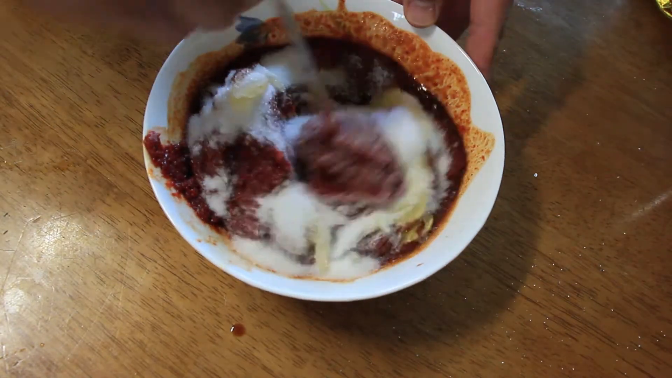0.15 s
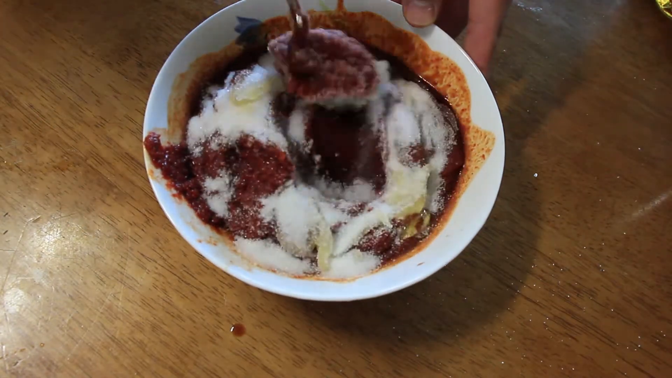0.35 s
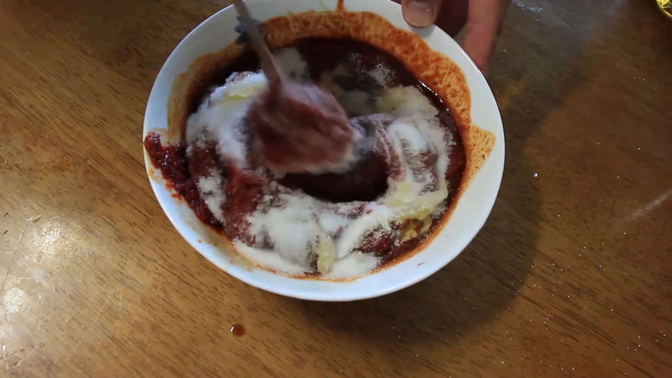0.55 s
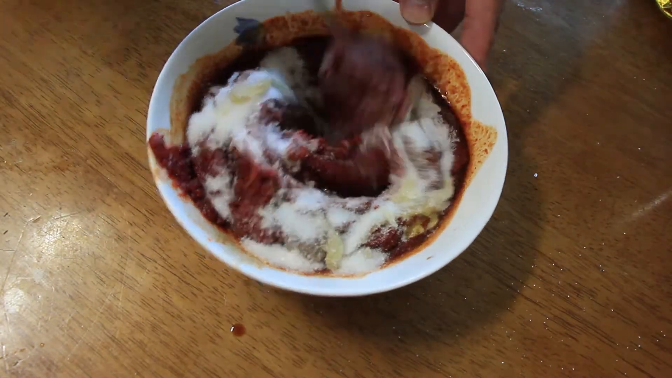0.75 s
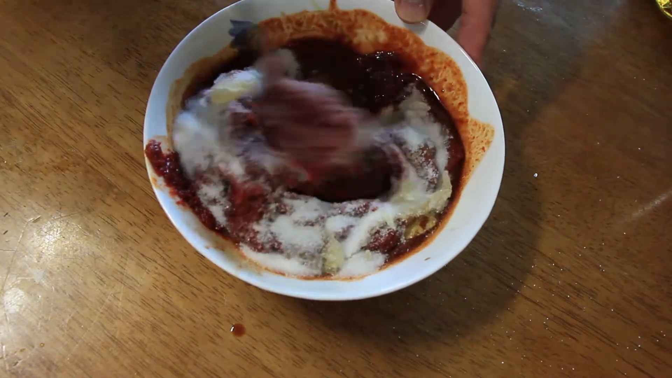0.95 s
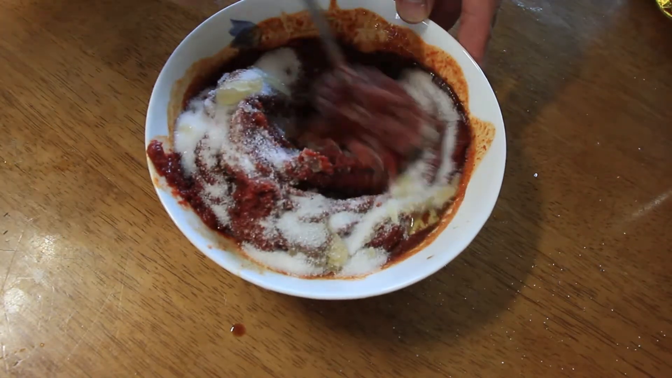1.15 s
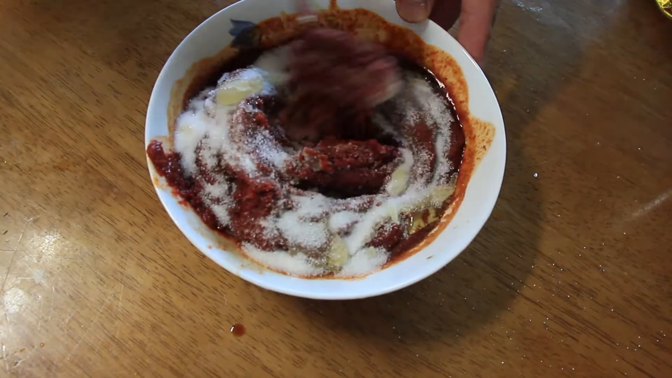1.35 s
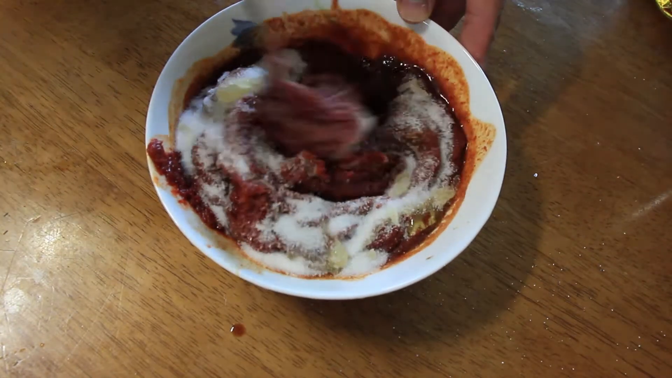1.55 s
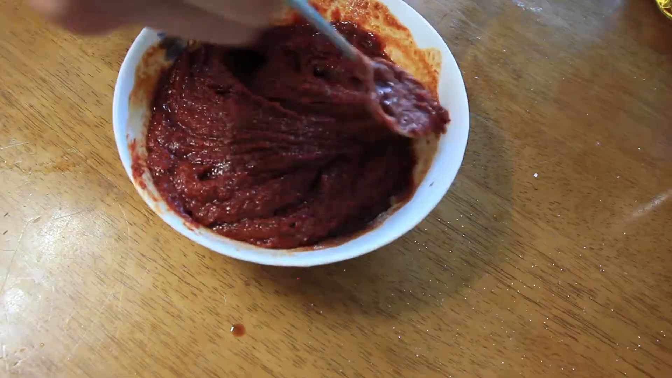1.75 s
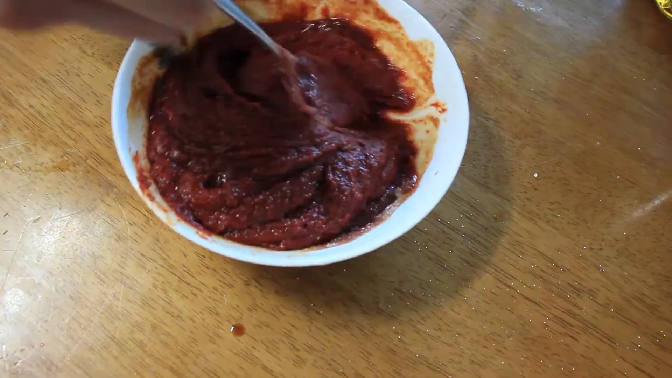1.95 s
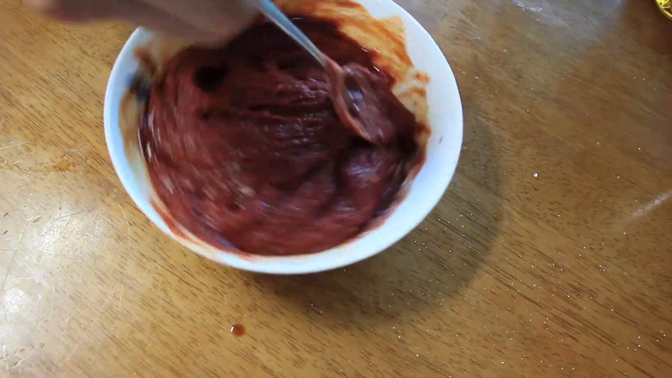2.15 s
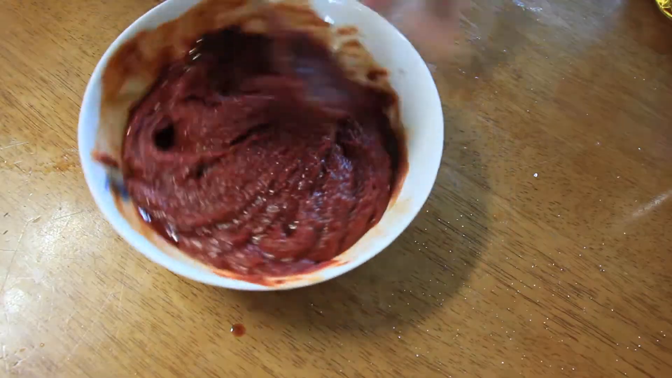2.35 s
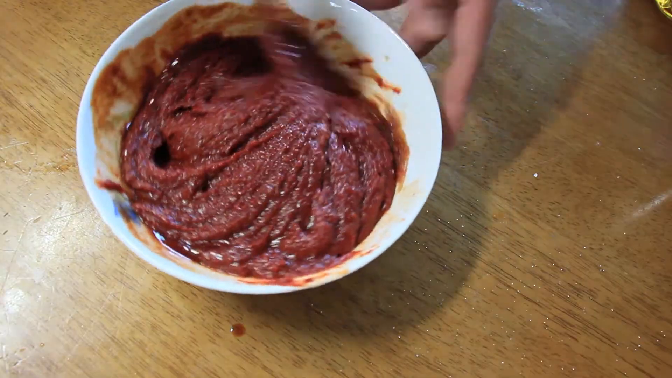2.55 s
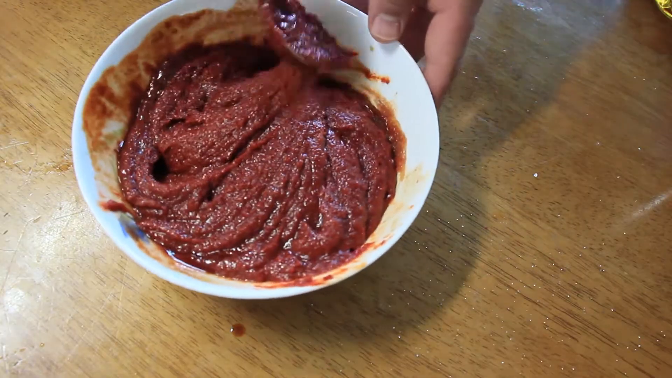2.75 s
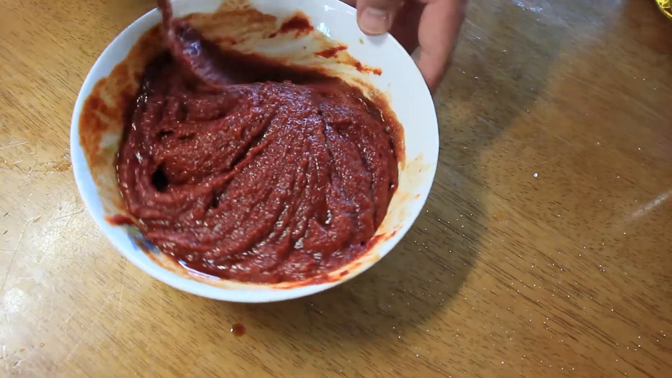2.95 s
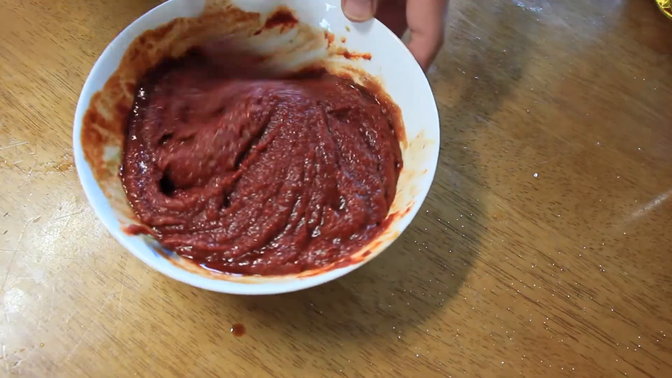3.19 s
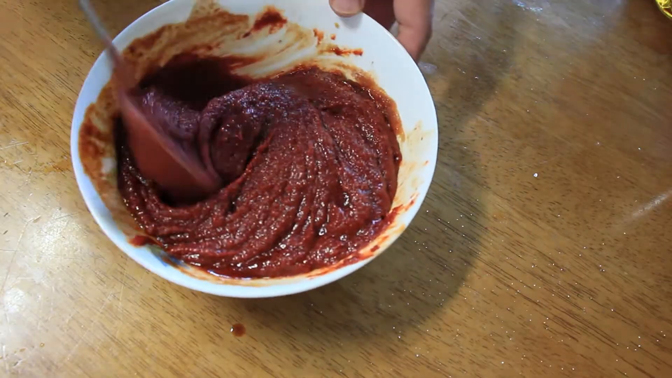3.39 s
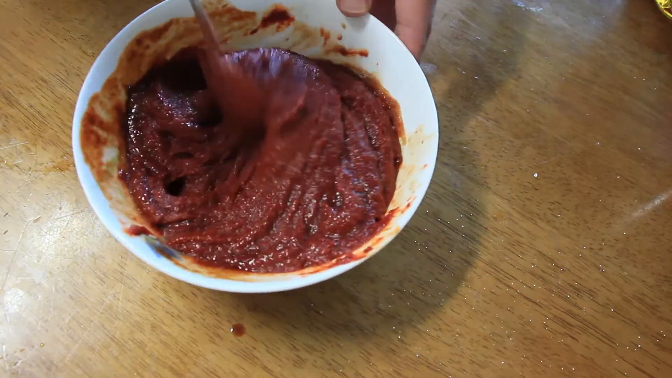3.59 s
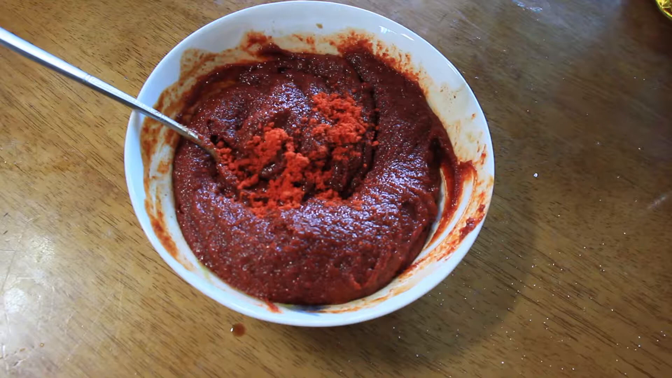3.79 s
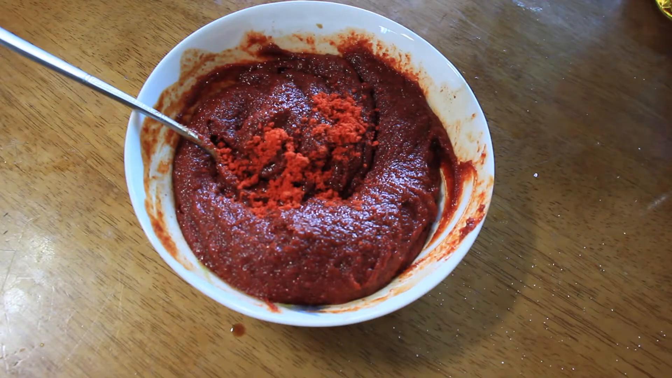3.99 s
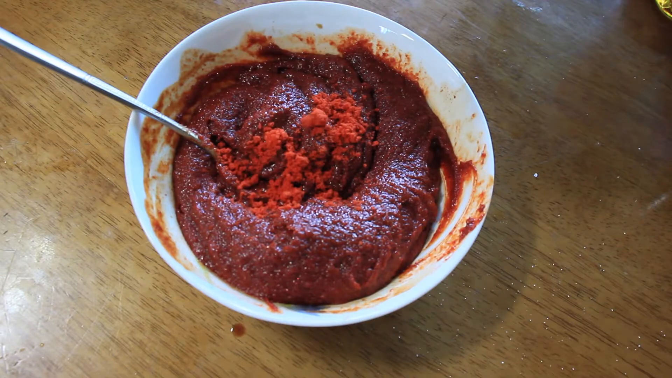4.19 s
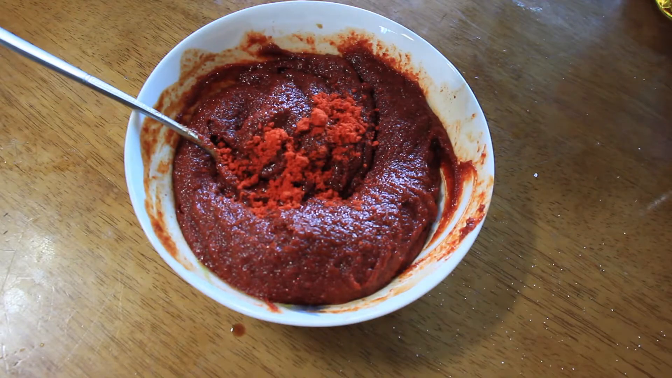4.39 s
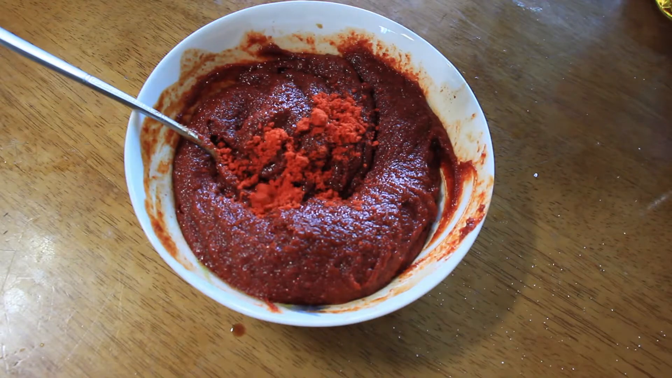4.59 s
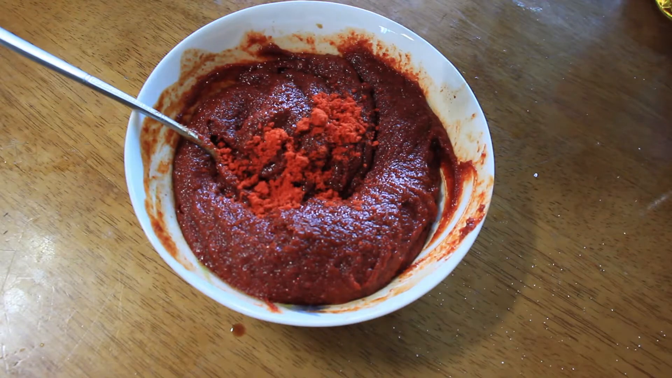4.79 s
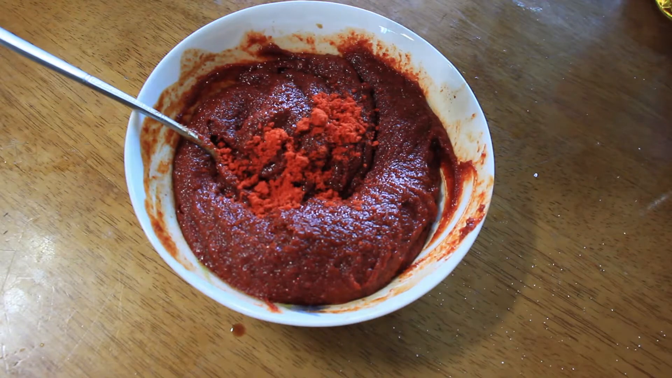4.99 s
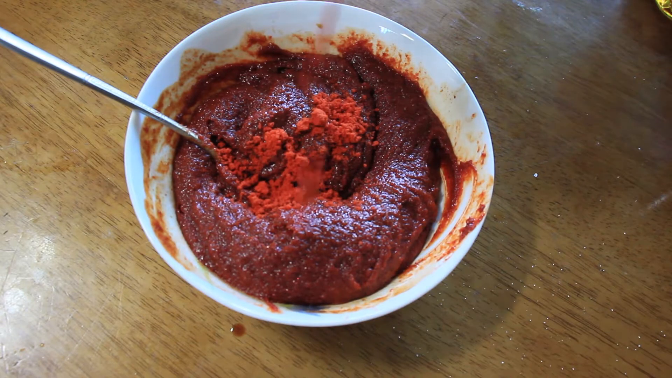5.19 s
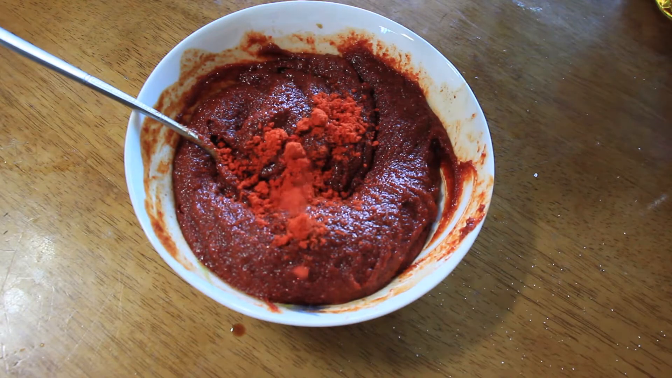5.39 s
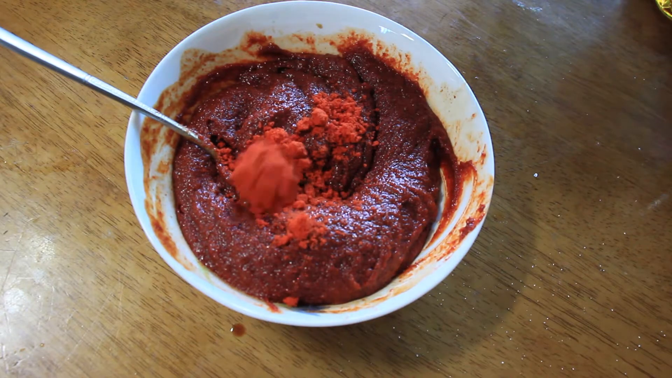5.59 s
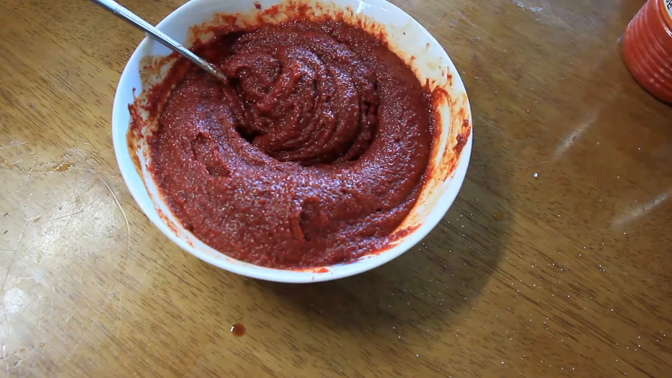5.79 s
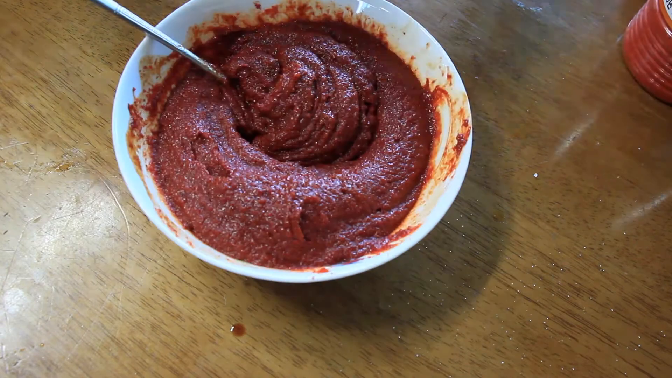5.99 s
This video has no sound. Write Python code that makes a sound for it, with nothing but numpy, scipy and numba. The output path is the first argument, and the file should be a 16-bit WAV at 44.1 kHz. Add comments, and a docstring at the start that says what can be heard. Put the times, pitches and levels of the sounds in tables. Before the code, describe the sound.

A metal spoon stirs thick paste in a ceramic bowl, with dull knocks, table thuds, wet smacks and two sharp clinks.

```python
"""Stirring paste in a ceramic bowl

A steel spoon stirs thick paste in a bowl on a wooden table, close to a camera microphone in a small room.
Each impact excites the paste-damped modes of the bowl and, near the rim, the ring of bare ceramic; the
rocked bowl thuds back on the table. The paste smacks and rustles, and the sliding edge squeaks faintly.
The camera lowers its gain after loud knocks and clips the hardest."""
import sys
import numpy as np
from scipy import signal
from scipy.fft import rfft, irfft
from scipy.io import wavfile
from scipy.ndimage import uniform_filter1d
from numba import njit

SR = 44100
rng = np.random.default_rng(int(sys.argv[2]) if len(sys.argv) > 2 else 0)


def dump_mix(stems):
    """Bounce the given channels to the path in sys.argv[1] as a 16-bit WAV at rate SR."""
    frames = np.atleast_2d(stems).T  # one column per channel
    limited = np.clip(frames, -1, 1)  # hard clip at full scale
    pcm = np.round(limited * 32767).astype(np.int16)
    wavfile.write(sys.argv[1], SR, pcm)


N = 266319

# spoon impacts: start_s, bowl_db, wall_height (0-1), table_db, crack_db, click_db, rim_db, spoon_db
STRIKES = [(0.1931, -6.5, 0.43, -15.5, -8, -53, -70, -70),
           (0.465, -23, 0.68, -28.5, -23.5, -20.5, -61, -67),
           (0.7973, -14.5, 0.52, -17, -25.5, -24.5, -70, -70), (1.158, -4, 0.41, -14, -24, -70, -70, -65),
           (1.4684, -8, 0.59, -12, -27.5, -26, -65, -69), (1.8312, -37, 1, -38, -22.5, -28, -46, -37),
           (2.1716, -24, 0.46, -24.5, -24, -24, -44, -38.5),
           (2.4925, -9.5, 0.76, -20, 4.5, -1, -3.5, -27.5), (2.6168, -18.5, 0.96, -29, -18, -35, -70, -70),
           (2.8382, -10.5, .83, -19, -17, -19, -32, -64), (3.1529, -6.5, 0.91, -21, 3, -1.5, -5, -21),
           (3.5567, -20, 0.34, -28, -33, -35, -78, -78)]
# landings of the bowl's foot: start_s, level_db, boom_offset_db, softness (0-1)
LANDINGS = [(0.5225, -16, -0.5, 0.17), (0.9024, -6.5, -4.5, 0.13), (1.3704, -43, 3, 0),
            (1.563, -2.5, -6, 0.14), (1.845, -20, -1, 0.05), (2.085, -31.5, 1, 0.76),
            (2.247, -17.5, -21.5, 0.23), (2.2585, -4.5, -9, 0.12), (2.5623, -12, -1.5, 0.11),
            (2.7641, -44, 1, 1), (2.975, -23.5, -1.5, 0.14), (3.0974, -26.5, 4.5, 0.44),
            (3.4149, -20, -2.5, 0.94), (3.423, -21.5, -21, 0.12)]
# normal modes of bowl, spoon and table top: pitch_hz, relative_db, t60_s
BOTTOM_MODES = [(760, -7, .03), (805, -2, .03), (880, -4, .04), (960, 0, .035), (1062, -2, .04),
                (1165, -3, .03), (1260, -4, .03)]
WALL_MODES = [(1400, -3, .018), (1540, 0, .018), (1680, -2, .018), (1860, 0, .018), (2020, -1, .018),
              (2230, -6, .02), (2450, -10, .02)]
RIM_MODES = [(3380, -6.5, 0.29), (3500, 13.5, 0.083), (3525, -8.5, 0.35), (4760, -9.5, 0.36),
             (4790, -6.5, 0.35), (6434, -5, 0.38), (6480, -10.5, 0.31), (6460, 13, 0.06), (6690, -17, .12),
             (8180, -12, 0.3), (8220, -4.5, 0.11), (9830, -27.5, .2), (12300, -40, .15)]
SPOON_MODES = [(2810, -2, .15), (3800, -9, .15), (4870, -4, .15), (4950, -3, .13), (5030, -6, .12),
               (8280, -6, .1), (10050, -10, .12)]
TABLE_BOOM_MODES = [(153, -16, 0.35), (213.9, -6, 0.36), (257.2, -1.5, 0.43), (303, 2.5, 0.12),
                    (320, -1, 0.078), (348.6, 3.5, 0.12)]
TABLE_UPPER_MODES = [(415, -8, .12), (450, -2, .09), (480, -5, .08), (535, -4, .07), (585, -5, .08),
                     (630, -4, .07)]
# paste letting go: start_s, level_db
SMACKS = [(1.3074, -38), (1.4177, -30.5), (2.186, -29), (2.3411, -35), (2.6074, -25), (2.6469, -34),
          (2.883, -24), (2.9059, -26), (2.9194, -46), (2.94, -33), (3.0, -36.5), (3.0385, -40),
          (3.0691, -32.5), (3.0859, -41), (3.2297, -21.5), (3.2868, -27)]
# falling powder lumps: start_s, level_db
LUMPS = [(4.05, -50), (4.338, -43), (4.9395, -47.5), (5.0404, -45.5), (5.204, -46), (5.217, -41.5),
         (5.4594, -50), (5.738, -49), (5.934, -46), (5.943, -37.5), (5.953, -40), (5.968, -48)]
# strokes through paste and sugar: start_s, length_s, level_db
STROKES = [(0.0, .05, -50.5), (0.08, 0.13, -55), (.29, .11, -60), (.405, .06, -52.5), (0.505, 0.036, -52),
           (0.756, 0.064, -48), (.83, 0.12, -54), (1.07, 0.098, -56), (1.412, 0.058, -60),
           (2.189, 0.038, -45.5), (2.877, 0.039, -41), (5.94, .075, -61)]
# squeaks of the sliding edge: start_s, length_s, pitch_hz, level_db
SQUEAKS = [(2.08, 0.058, 10200, -73), (2.265, 0.056, 10540, -63.5)]
# reverberation time by band: centre_hz, t60_s
ROOM_DECAY = [(150, 0.26), (400, 0.27), (1000, 0.4), (2500, 0.26), (6000, 0.11), (13000, 0.15)]
# spectral density of the background noise: frequency_hz, relative_db
AIR_SPECTRUM = [(20, -14), (60, -9), (140, -16.5), (200, -2), (400, -5), (900, -5.5), (1800, -9),
                (3500, -12), (8000, -18), (15500, -20.5)]

HEIGHT_TILT_DB = 30  # rise of wall over bottom modes, from the lowest strike point to the highest
ROLL_S, ROLL_CONTACTS, ROLL_FADE_DB = 0.015, 4, 8.5
STIRRING_SPAN_S, SMALL_SMACK_COUNT = (.9, 3.3), 10
SQUEAK_SAG_HZ_PER_S = 12000


def spoon_strikes():
    """The point of impact weights the modes: higher strikes favour the wall; steel and glaze ring on."""
    start_s, bowl_db, height, table_db, crack_db, click_db, rim_db, spoon_db = np.transpose(STRIKES)
    tilt_db = HEIGHT_TILT_DB * (height - .5) / 2
    body = bowl_on_table(start_s, table_db - 3, table_db, bowl_db - tilt_db, bowl_db + tilt_db, crack_db)
    rim = ring(RIM_MODES, start_s, rim_db, contact_ms=.05, scatter_db=1)
    spoon = ring(SPOON_MODES, start_s, spoon_db, contact_ms=.05, scatter_db=1)
    flutter = undb(3 * flicker(150))  # spoon and paste still touch the wall
    clicks = bursts(start_s, click_db, hz=10000, octaves=1.9, t60_s=.0098)
    return body + (rim + spoon) * flutter + clicks


def bowl_landings():
    """Repeated impact: the round foot rolls down in quick contacts; soft ones excite mostly the wood."""
    start_s, level_db, boom_offset_db, softness = np.repeat(LANDINGS, ROLL_CONTACTS, axis=0).T
    is_later = np.arange(len(start_s)) % ROLL_CONTACTS > 0
    start_s = start_s + ROLL_S * is_later * rng.random(len(start_s))
    table_db = level_db - 2.5 - ROLL_FADE_DB * (1 - softness) * is_later
    boom_db = table_db + boom_offset_db
    bottom_db = table_db - 1.5 - 7 * softness
    wall_db = table_db + 3 - 84 * softness
    crack_db = table_db - 13.5 - 61 * softness
    return bowl_on_table(start_s, boom_db, table_db, bottom_db, wall_db, crack_db, contact_scale=1.23)


def bowl_on_table(start_s, boom_db, table_db, bottom_db, wall_db, crack_db, contact_scale=1):
    """Force transmission: one blow drives table top and damped bowl, with a crack of contact noise."""
    boom = ring(TABLE_BOOM_MODES, start_s, boom_db, contact_ms=1.1 * contact_scale)
    wood = ring(TABLE_UPPER_MODES, start_s, table_db, contact_ms=1. * contact_scale)
    bottom = ring(BOTTOM_MODES, start_s, bottom_db, contact_ms=.6 * contact_scale)
    wall = ring(WALL_MODES, start_s, wall_db, contact_ms=.35 * contact_scale)
    crack = bursts(start_s, crack_db, hz=3300, octaves=1.9, t60_s=.021)
    return boom + wood + bottom + wall + crack


def ring(modes, start_s, level_db, contact_ms, scatter_db=3):
    """Modal superposition: blows excite damped sinusoids; a longer contact puts in less treble."""
    norm = np.sqrt(sum(undb(mode_db) ** 2 for _, mode_db, _ in modes))
    share_db = scatter_db * rng.standard_normal((len(start_s), len(modes)))  # no two blows are alike
    response = np.zeros(N)
    for k, (hz, mode_db, t60_s) in enumerate(modes):
        blows = np.zeros(N)
        np.add.at(blows, (start_s * SR).astype(int), undb(level_db + mode_db + share_db[:, k]) / norm)
        decay = np.exp(-np.log(1000) / (t60_s * SR))
        angle = 2 * np.pi * hz / SR
        response -= signal.lfilter([0, np.sin(angle)], [1, -2 * decay * np.cos(angle), decay**2], blows)
    force = np.sin(np.pi * np.clip(np.arange(128) / (contact_ms * SR / 1000), 0, 1)) ** 2 + 1e-9
    vibration = np.convolve(response, force / force.sum())[:N]
    return highpass(vibration, .8 * modes[0][0])  # little radiates below the lowest mode


def paste_rustle():
    """Amplitude-modulated noise: tiny bubbles and crystals make a grainy rustle during each stroke."""
    drag = sum(undb(db) * np.sqrt(swell(start_s, length_s)) for start_s, length_s, db in STROKES)
    grains = rng.standard_normal(N) * undb(2.7 * flicker(216))
    rustle = band(band(grains, 3200, 2.4), 3200, 2.4)
    return unit_rms(rustle) * uniform_filter1d(drag, SR // 50)


def paste_smacks():
    """Sudden release: paste letting go emits brief transients, with faint ones scattered among them."""
    when, strength = rng.random((SMALL_SMACK_COUNT, 2)).T
    start_s, level_db = np.transpose(SMACKS)
    start_s = np.r_[start_s, np.interp(when, [0, 1], STIRRING_SPAN_S)]
    level_db = np.r_[level_db, -45 + 4 * strength]
    return bursts(start_s, level_db, hz=5800, octaves=2, t60_s=.006)


def falling_lumps():
    """Soft impact: each lump of powder lands with an unpitched tick."""
    return bursts(*np.transpose(LUMPS), hz=3000, octaves=1.8, t60_s=.03)


def squeaks():
    """Sliding friction: the edge gives thin tones whose pitch wavers and sags."""
    t, out = np.arange(N) / SR, np.zeros(N)
    for start_s, length_s, pitch_hz, level_db in SQUEAKS:
        sag_hz = SQUEAK_SAG_HZ_PER_S * np.clip(t - start_s, 0, length_s)
        wavering_hz = (pitch_hz - sag_hz) * (1 + .004 * flicker(79))
        tone = np.sqrt(2) * np.sin(2 * np.pi * np.cumsum(wavering_hz) / SR)
        out += undb(level_db) * swell(start_s, length_s) * tone
    return out


def reverberation(direct):
    """Diffuse field: dense echoes merge into exponentially decaying noise, each band at its own rate."""
    t = np.arange(SR // 2) / SR
    tail = sum(band(rng.standard_normal(len(t)), hz, 1.4) * 1000. ** (-t / t60) for hz, t60 in ROOM_DECAY)
    tail *= 1 - np.exp(-t / .0021)  # the echoes build up
    tail /= np.sqrt(np.sum(tail ** 2))
    return signal.fftconvolve(direct, tail)[:N] * undb(-8)


def air():
    """Noise floor: room tone and microphone hiss form a continuous spectrum that wavers a little."""
    hz, relative_db = np.transpose(AIR_SPECTRUM)
    bin_hz = np.maximum(np.fft.rfftfreq(N, 1 / SR), 1)
    shape = undb(np.interp(np.log(bin_hz), np.log(hz), relative_db))
    hiss = irfft(rfft(rng.standard_normal(N)) * shape, N)
    return unit_rms(hiss) * undb(-54 + .27 * flicker(12))


def bursts(start_s, peak_db, hz, octaves, t60_s):
    """Noise transients: exponentially decaying bursts, confined to one band."""
    t = np.arange(2048) / SR
    out = np.zeros(N + len(t))
    noise = rng.standard_normal((len(start_s), len(t))) * 1000. ** (-t / t60_s)
    noise = band(band(noise, hz, octaves), hz, octaves)
    for onset, gain, burst in zip((start_s * SR).astype(int), undb(peak_db), noise):
        out[onset:onset + len(t)] += gain * burst / np.abs(burst).max()
    return out[:N]


def swell(start_s, length_s):
    """Half-sine envelope: one smooth rise and fall."""
    return np.sin(np.pi * np.clip((np.arange(N) / SR - start_s) / length_s, 0, 1))


def flicker(rate_hz):
    """Random modulation: smoothed noise of unit RMS that changes about rate_hz times a second."""
    width = int(SR / rate_hz)
    return unit_rms(uniform_filter1d(uniform_filter1d(rng.standard_normal(N), width), width))


def band(x, hz, octaves):
    """Second-order band-pass about a centre frequency."""
    edges_hz = np.minimum(hz * 2. ** (np.array([-.5, .5]) * octaves), .49 * SR)
    return signal.sosfilt(signal.butter(1, edges_hz, "band", fs=SR, output="sos"), x)


def highpass(x, hz):
    """Fourth-order roll-off below a cutoff frequency."""
    return signal.sosfilt(signal.butter(4, hz, "high", fs=SR, output="sos"), x)


def undb(db):
    """Decibels as an amplitude ratio."""
    return 10 ** (np.asarray(db) / 20)


def unit_rms(x):
    """Normalisation to unit power."""
    return x / np.sqrt(np.mean(x ** 2))


@njit
def peak_envelope(x, release_s):
    """Peak detection: instant attack, exponential release."""
    decay = np.exp(-1 / (release_s * SR))
    held, envelope = 0., np.empty(len(x))
    for i in range(len(x)):
        held = max(abs(x[i]), held * decay)
        envelope[i] = held
    return envelope


def scene():
    """Superposition: direct sound, reverberation and noise floor add at the microphone."""
    knocks = spoon_strikes() + bowl_landings()
    direct = knocks + paste_rustle() + paste_smacks() + falling_lumps() + squeaks()
    direct = highpass(direct, 120)  # deep bass is rolled off on all the close sounds
    return (direct + reverberation(direct) + air())[None]


def record(dry):
    """Automatic gain control: gain sinks after loud peaks; the converter clips and limits bandwidth."""
    peak = peak_envelope(dry[0], release_s=.25)
    target_gain = np.minimum(1, (undb(-6) / (peak + 1e-9)) ** .45)  # compression above -6 dB
    gain = signal.lfilter([1 / 400], [1, 1 / 400 - 1], target_gain - 1) + 1  # a 9 ms lag lets attacks pass
    clipped = np.clip(dry * gain, -1, 1) + .0009  # the converter's DC offset
    lowpass = signal.ellip(8, .2, 40, 15600, fs=SR, output="sos")
    return signal.sosfilt(lowpass, clipped)


dry = scene()
out = record(dry)
dump_mix(out)
```